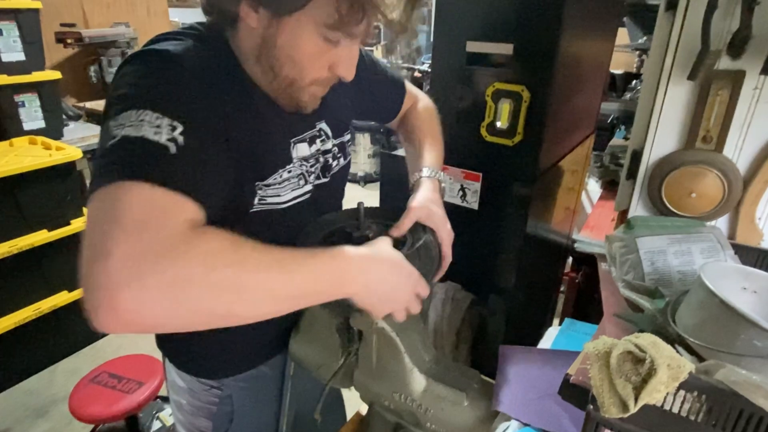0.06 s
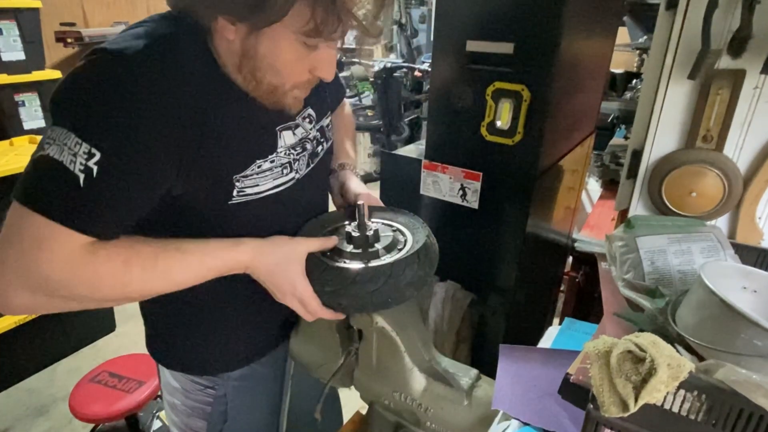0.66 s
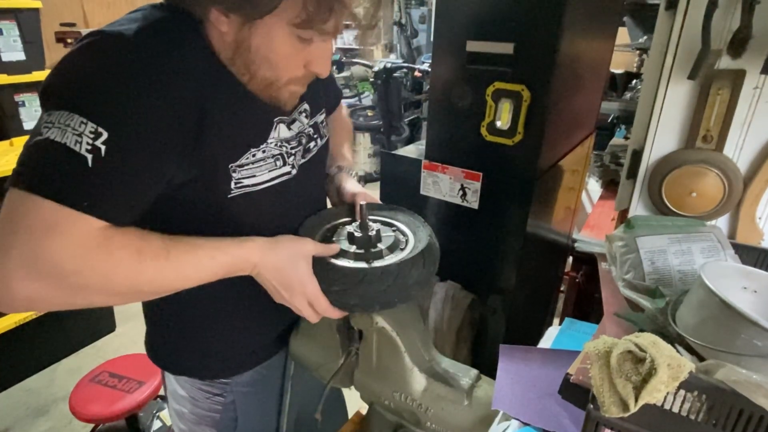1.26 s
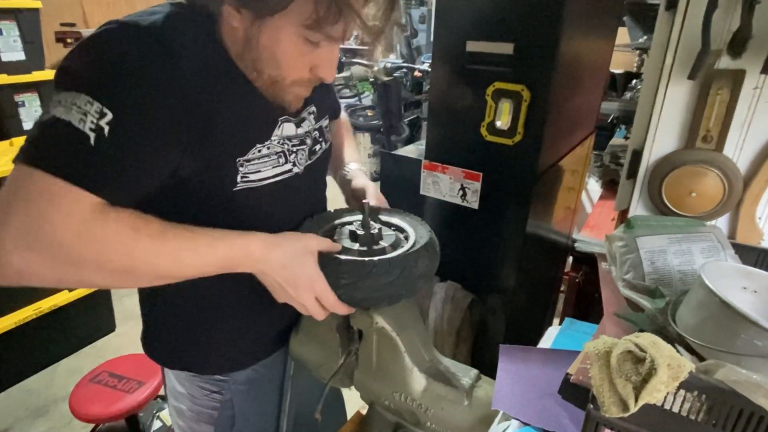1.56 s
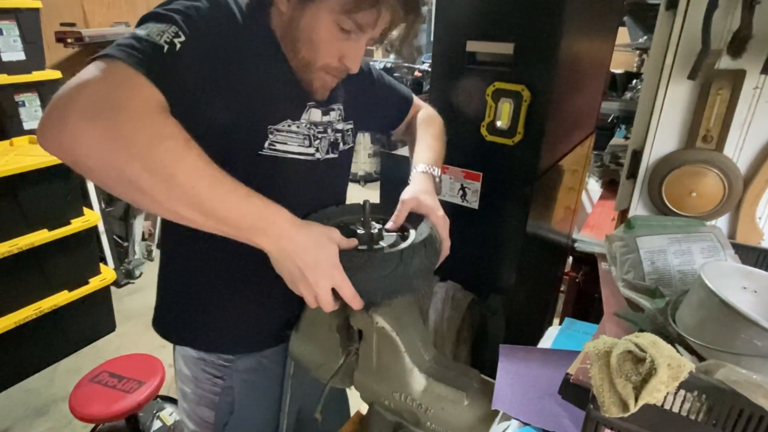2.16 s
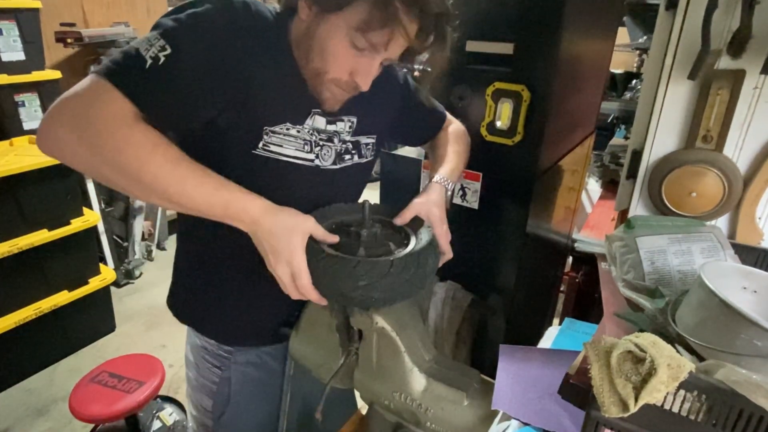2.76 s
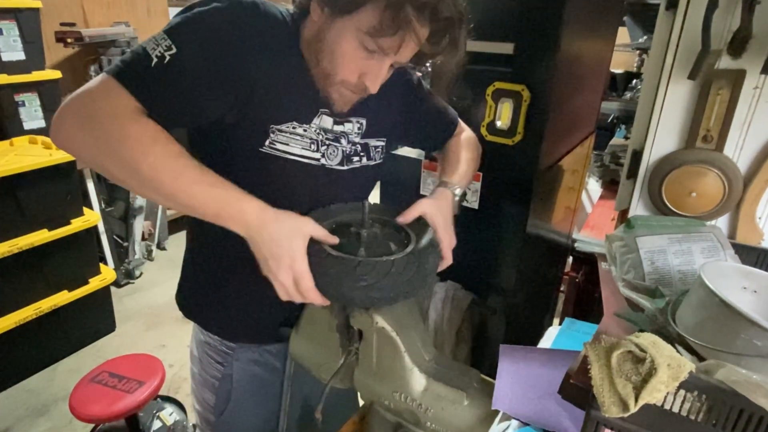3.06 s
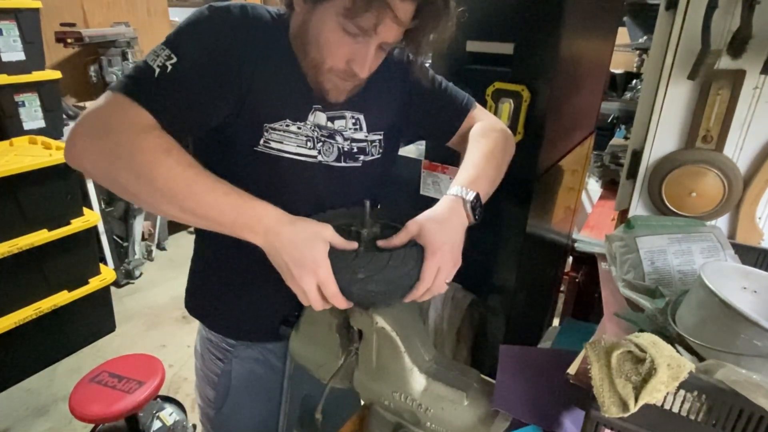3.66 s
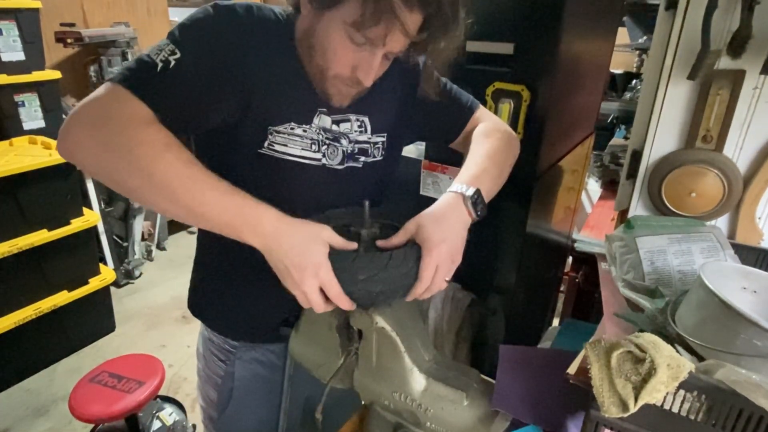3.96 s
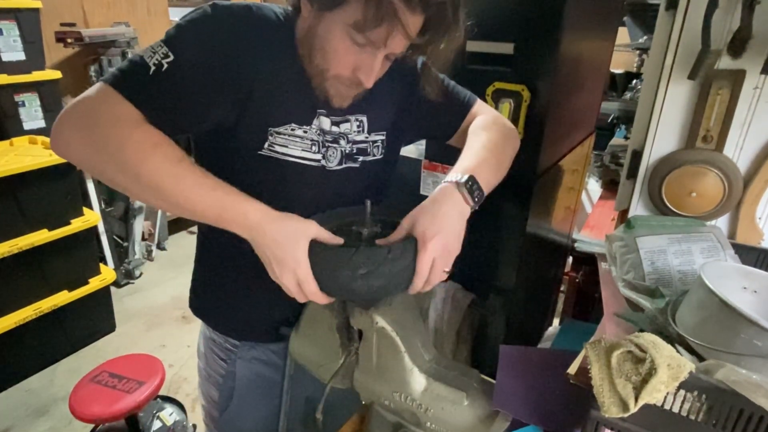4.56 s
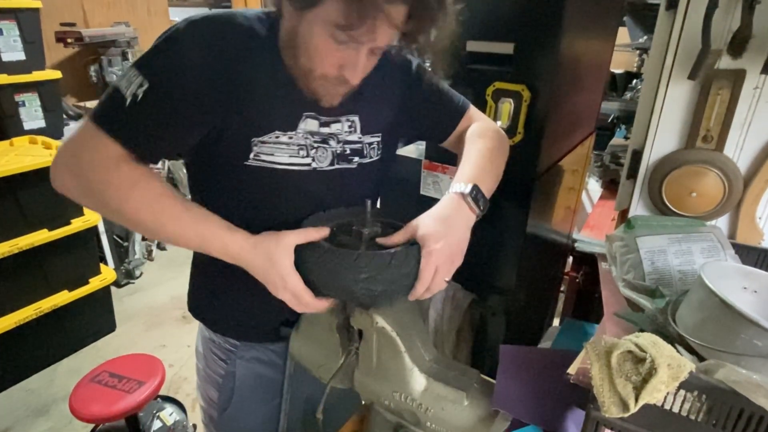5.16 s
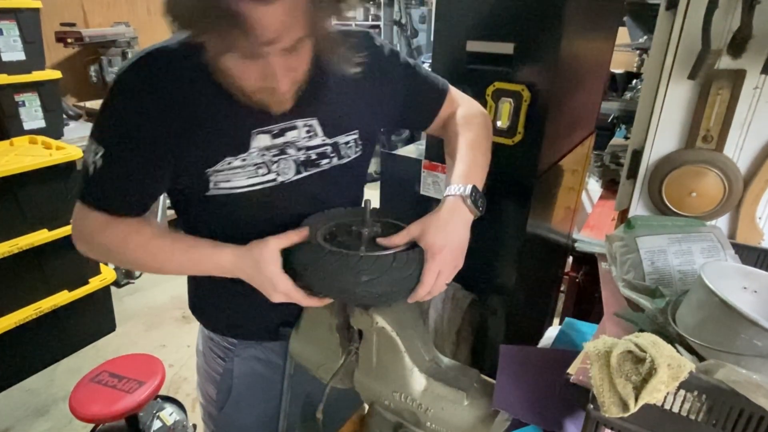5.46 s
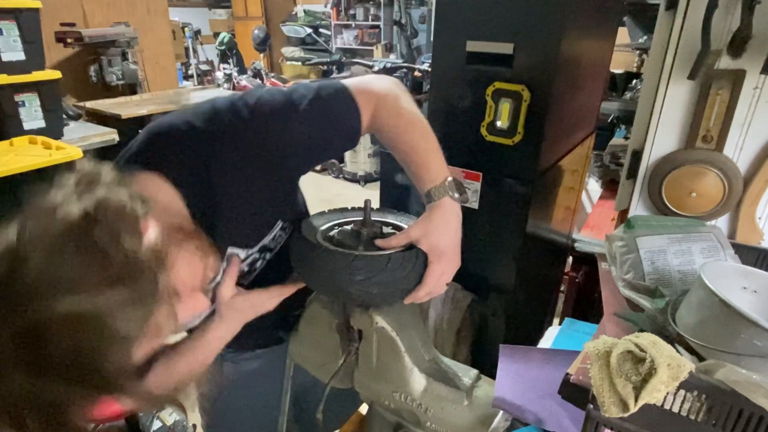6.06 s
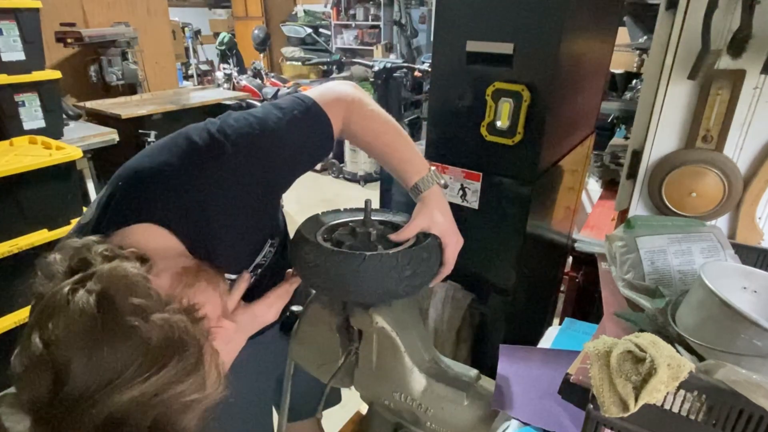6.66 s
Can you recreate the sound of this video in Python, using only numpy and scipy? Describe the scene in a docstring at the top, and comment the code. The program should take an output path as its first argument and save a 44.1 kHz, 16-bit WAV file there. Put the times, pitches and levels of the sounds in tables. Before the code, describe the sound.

Close up in a small, dry-sounding workshop, stretched rubber catches and snaps over a metal wheel rim as a flat tire is pulled by hand. An early sharp chirp and a ringing clink stand out. After some softer ticks comes a cluster of snaps, rasps and hollow creaks with lighter clinks. Hands and sleeves rustle over the low rumble of the rocking stand, then the handling dies down.

```python
"""Rubber scrapes, snaps and chirps as a small flat tire is worked off its metal rim by hand.
The stretched bead catches on the metal, snaps over it and slips in short falling chirps;
the hollow tire groans and its soft carcass wobbles. The rim clinks, once loudly.
Hands and sleeves rustle over the low rumble of the rocking stand, in a cluttered workshop."""
import sys
import numpy as np
from scipy import signal
from scipy.fft import rfft, irfft, next_fast_len
from scipy.io import wavfile
from scipy.ndimage import map_coordinates

SR = 44100
rng = np.random.default_rng(int(sys.argv[2]) if len(sys.argv) > 2 else 0)


def master_out(mix):
    """Clip the mix to full scale and print it as 16-bit PCM to the path in sys.argv[1]."""
    frames = np.transpose(np.atleast_2d(mix))
    ceiling = np.clip(frames, -1, 1)
    pcm = np.round(ceiling * 32767).astype(np.int16)
    wavfile.write(sys.argv[1], SR, pcm)


N = 305216

# Noise colours, each: freq_hz, density_db
AIR_EQ = [(59, -36), (100, -5), (185, -19.5), (415, -34.5), (705, -35), (1480, -50.5), (12000, -51.5),
          (16000, -56)]  # room tone
RUMBLE_EQ = [(11, -32), (22, -5), (45, 2), (70, 8), (83, 6), (108, 0.5), (141, -8), (160, -17),
             (210, -47.5), (350, -120)]  # rocking stand
CLOTH_EQ = [(530, -34.5), (900, -4.5), (1100, -5), (4010, -7), (7060, -4), (7860, -7.5), (11600, -3.5),
            (13400, -24.5), (14500, -9.5), (16000, -18.5)]  # skin and sleeves
FLEX_EQ = [(65, -22.5), (110, 5), (177, -1.5), (242, -1.5), (345, -4), (404, -24.5), (520, -14.5),
           (680, -43.5), (1140, -120)]  # bending rubber
SCRAPE_EQ = [(240, -27.5), (400, -4.5), (677, -5), (1120, -15), (1370, -8.5), (1850, -18), (2110, -8),
             (2470, -20), (7000, -24.5), (9100, -53.5), (15400, -120)]  # rubber on metal
CLANK_EQ = [(710, -57), (1200, -28.5), (1350, -13.5), (1870, -30), (2400, -8.5), (3800, -26), (4500, -13.5),
            (6200, -13), (6950, -1), (8000, -21.5), (9820, -6.5), (12200, -23), (13600, -35.5),
            (15000, -27), (16000, -26.5)]  # struck rim
KNOCK_EQ = [(110, -19), (200, 2), (450, -12), (700, -9), (1300, -8), (1800, -17), (2150, -12), (2900, -21),
            (4200, -31.5), (5460, -40.5), (9240, -120)]  # dull body of a snap
CLICK_EQ = [(1470, -16.5), (2200, -9), (3000, 0), (3850, -9), (4700, 1), (6200, -7), (7300, -2),
            (8200, -12.5), (11800, -12), (13600, -25), (14800, -21.5), (16000, -25.5)]  # bright tip of a snap
# Stereo spread of the noises: freq_hz, side_over_mid_db
STEREO_WIDTH = [(60, -14.5), (150, -16), (350, 5), (1000, 1), (4000, -0.5), (12000, 0)]
# Workshop reverb: freq_hz, t60_s
ROOM_DECAY = [(150, 0.32), (700, 0.16), (2500, 0.18), (7000, 0.18), (14000, 0.056)]

# Rubber resonances, each: pitch_hz, width_hz, level_db
CAVITY_MODES = [(145, 40, 6.5), (244, 6.2, 1.5), (327, 32, -4), (438, 30, -18), (548, 13, -12),
                (660, 16, -4.5), (2110, 80, -20)]  # hollow of the tire
BEAD_MODES = [(580, 120, 0.5), (900, 320, -4), (2020, 170, -1.5)]  # stretched bead
TIRE_MODES = [(667.4, 46, 0), (1050, 160, -4), (1350, 38, -5), (2144, 60, -12), (2850, 110, -12.5)]  # damped ring after a snap
# Ring of the metal rim: pitch_hz, level_db, t60_s, left_over_right_db
RIM_MODES = [(2270, -15, .17, 5), (2420, -12.5, .18, 9), (3042, -16, .25, -1), (3260, -18, .28, 4),
             (4468, -16, .4, 1), (4590, -17, .26, 1), (5733, -11, .25, 4), (5830, -11, .2, 6),
             (6685, -12, .26, 4), (6990, 1.5, .27, 4), (7380, -15, .22, 0), (8696, -6, .27, 9),
             (9560, -9, .33, -8), (9876, -3, .27, -14), (10110, -9, .3, -6), (10990, -7, .3, 0),
             (11753, -11, .32, 0), (12190, -11, .24, 0), (14550, -17, .3, 2)]

# Level rides, each: time_s, level_db
STAND_SWAY = [(0.0, -50.5), (0.77, -61), (1.17, -48), (1.97, -56), (2.12, -43), (2.51, -62), (2.91, -50),
              (3.89, -54), (4.1, -54), (4.87, -44), (5.3, -52.5), (5.78, -59), (6.92, -63)]  # the wheel rocking on its stand
HAND_EFFORT = [(0.0, -52.5), (0.35, -68), (0.72, -69.5), (1.13, -62.5), (1.42, -52.5), (1.69, -62.5),
               (1.85, -66), (2.16, -57.5), (2.45, -69.5), (2.9, -70), (3.14, -63.5), (3.62, -69.5),
               (3.9, -64.5), (4.38, -60.5), (4.55, -63.5), (4.68, -60), (4.99, -62), (5.25, -74),
               (5.8, -62.5), (6.34, -65.5), (6.61, -81.5), (6.92, -70)]  # how hard the hands flex the rubber
# Strokes, each: start_s, level_db, length_s
SWISH_CUES = [(-.02, -53.5, .2), (0.208, -58.5, 0.23), (0.452, -62.5, 0.28), (0.753, -66, 0.26),
              (2.25, -68, 0.25), (2.46, -57, .12), (2.514, -68, 0.28), (3.001, -62, 0.18),
              (3.178, -54, 0.29), (4.062, -60.5, .18), (5.291, -62.5, 0.34), (5.615, -57, 0.42),
              (5.819, -62.5, 0.41), (6.834, -72.5, 0.2)]  # palms and sleeves over the tread
GROAN_CUES = [(0.0, -63, 0.37), (.54, -56.5, 0.1), (1.3, -52, .36), (1.98, -51, 0.15), (3.0, -51, 0.14),
              (3.47, -54, 0.075), (3.7, -56, 0.27), (4.11, -49.5, 0.2), (4.47, -43, 0.11),
              (4.66, -54.5, 0.24), (4.9, -48.5, .16), (5.08, -56, 0.16), (5.478, -56, 0.047)]  # steady pulls on the tire
DRAG_CUES = [(1.31, -58.5, 0.44), (1.91, -53, 0.075), (3.6, -66.5, 0.2), (3.81, -57, 0.12),
             (4.44, -49.5, 0.13), (4.64, -49.5, 0.089), (4.87, -61.5, 0.26)]  # the bead dragging along the rim
GRAZE_CUES = [(1.81, -70, 0.059), (1.905, -64.5, 0.057), (3.44, -65.5, 0.079)]  # the rim grazing its stand
# The carcass springing back: start_s, level_db
WOBBLE_CUES = [(0.313, -39), (0.984, -18.5), (1.3, -32.5), (1.946, -31.5), (2.183, -30.5), (2.277, -35.5),
               (2.829, -29.5), (3.457, -29), (3.988, -27), (4.249, -27.5), (4.3, -34.5), (4.559, -23.5),
               (4.726, -31.5), (4.987, -34.5), (5.431, -43.5), (5.511, -38.5), (6.429, -43.5)]
# Metal striking the rim: start_s, level_db, favoured_hz, rolloff_db_per_octave
CLINK_CUES = [(1.562, -27, 7000, -1.5), (1.57, -21.5, 8000, 6.5), (1.575, -22, 8070, -3.5),
              (3.428, -30.5, 6760, 19), (4.229, -40, 7600, 16), (4.542, -43.5, 10100, 26),
              (5.052, -49, 4900, 26)]
# Rubber slipping as its tension lets go: start_s, level_db, start_hz, end_hz
SLIP_CUES = [(.9, -41.5, 255, 118), (0.964, -22.5, 169, 120), (0.957, -9.5, 1063, 785),
             (.962, -18.5, 266, 200), (.967, -24, 773, 610), (1.183, -39, 1390, 1200),
             (1.252, -34.5, 1250, 710), (1.28, -29, 232, 127.5), (2.02, -45.5, 260, 206),
             (2.078, -31.5, 1530, 1430), (2.212, -32.5, 1387, 1150), (2.767, -42, 334, 188),
             (2.805, -40.5, 576, 162), (3.917, -44, 1020, 525), (3.919, -35, 423, 170),
             (3.959, -37, 332, 129), (4.141, -44.5, 324, 243), (4.2272, -23.5, 2860, 2320),
             (4.2285, -19.5, 1460, 1340), (4.231, -23.5, 1396, 1200), (4.236, -27, 805, 580),
             (4.491, -37, 670, 304), (4.881, -38, 1660, 1250), (4.889, -35.5, 1043, 640),
             (4.894, -29, 478, 204), (4.926, -31.5, 238, 153), (5.4, -35.5, 373, 293),
             (5.404, -38, 219, 166), (5.479, -49.5, 442, 385)]
# The bead snapping over the rim: time_s, click_db, knock_db, crack_eq_db, top_eq_db, creep_s
SNAP_CUES = [(.0024, -33, -34, -1, -13.5, .0005), (.8031, -48, -46, 0.5, 3.5, .0008),
             (.8941, -28.5, -34.5, 0.5, 0.5, 0.00089), (0.9572, -24.5, -30, 2.5, -8.5, 0.00046),
             (1.0254, -40.5, -41.5, 1.5, -12.5, 0.0066), (1.1874, -46, -48.5, -6, -9, 0.0058),
             (1.2541, -38, -40.5, -3, -2.5, .0007), (1.27, -27.5, -34, -1, -3.5, .0027),
             (1.3432, -38, -44.5, 5, -16.5, 0.0098), (1.5725, -24.5, -39, 0.5, -7, 0.006),
             (2.077, -40, -38.5, -2, -15, 0.0044), (2.1308, -47, -41, -1, -9, .0013),
             (2.153, -38, -43.5, 6, -17.5, .003), (2.1723, -40.5, -44.5, 4.5, -16.5, .004),
             (2.2145, -40, -41, 2, -15, .002), (2.662, -51.5, -82, 3, -28.5, .0033),
             (2.77, -43, -46, 0.5, -16.5, .006), (2.804, -52.5, -44.5, -2, -16.5, .0005),
             (2.9947, -49.5, -46, -6.5, -18, 0.0044), (3.0527, -42.5, -51.5, 1, -19.5, 0.0081),
             (3.386, -39, -53.5, 0, -14, .0005), (3.431, -18, -42, 1, -18, 0.0044),
             (3.4554, -32.5, -43, 3.5, -4.5, 0.012), (3.5259, -33.5, -52, 0, -8, .0066),
             (3.6051, -31.5, -62, -2.5, -9, 0.00099), (3.673, -44.5, -53, -2, -13, 0.012),
             (3.973, -44.5, -47, 2, -12.5, .007), (4.0188, -51, -62, -2, -6.5, .001),
             (4.2284, -34, -37, 7.5, -20, 0.00056), (4.2478, -23, -40, -1.5, -16.5, .0045),
             (4.4514, -34, -52, 1, -16, 0.0011), (4.4688, -36.5, -39.5, 3, -26, .0053),
             (4.484, -26.5, -42.5, -1, -20.5, 0.0024), (4.533, -34.5, -52, 2, -9.5, .001),
             (4.5428, -27.5, -46.5, 1, -10.5, .0007), (4.559, -38.5, -58, -6, -11.5, .002),
             (4.665, -37, -48.5, 3, -19, .004), (4.6959, -26.5, -36.5, 0, -16.5, 0.0092),
             (4.9107, -44, -38.5, 2, -13.5, 0.0018), (4.9335, -38.5, -43, 0, -11.5, .0058),
             (4.955, -35, -47.5, -5.5, -19, 0.0067), (5.0505, -33, -46, 0, -18.5, .0062),
             (6.144, -51.5, -64, -3, -32, .0032), (6.2183, -51, -83, 0, -27, .0024)]


def amp(db):
    """Decibels to gain."""
    return 10 ** (np.asarray(db) / 20)


def unit(x):
    """Scale to rms 1."""
    return x / np.sqrt(np.mean(x ** 2) + 1e-20)


def along(points, hz):
    """Read a curve on a log frequency axis."""
    freqs, values = np.transpose(points)
    return np.interp(np.log(hz + 1), np.log(freqs + 1), values)


def ride(points):
    """A fader ride in dB, one value per sample."""
    return np.interp(np.arange(N) / SR, *np.transpose(points))


def drift(rate_hz):
    """A smooth random wander."""
    knots = rng.standard_normal(int(N * rate_hz / SR) + 4)
    return map_coordinates(knots, [np.arange(N) * rate_hz / SR])


def filtered(x, response):
    """Apply a frequency response."""
    size = next_fast_len(x.shape[-1] + 8192)
    return irfft(rfft(x, size) * response(np.fft.rfftfreq(size, 1 / SR)), size)[..., :x.shape[-1]]


def resonate(x, modes):
    """Play x through parallel resonances."""
    return filtered(x, lambda f: sum(amp(db) * 1j * f * width / (hz ** 2 - f ** 2 + 1j * f * width)
                                     for hz, width, db in modes))


def coloured(pair, eq):
    """Two unrelated signals become stereo at rms 1, near mono in the bass."""
    mid = filtered(pair[0], lambda hz: amp(along(eq, hz)))
    side = filtered(pair[1], lambda hz: amp(along(eq, hz) + along(STEREO_WIDTH, hz)))
    return unit(np.array([mid + side, mid - side]))


def grains(eq, rate_hz, spread_db):
    """Friction: tiny catches of uneven size at random moments."""
    catches = (rng.random(N) < rate_hz / SR) * amp(spread_db * rng.standard_normal(N))
    return coloured(catches * rng.standard_normal((2, N)), eq)


def narrow_noise():
    """White noise, mostly in the centre."""
    return rng.standard_normal(N) + 0.5 * rng.standard_normal((2, N))


def add(track, start_s, sound):
    """Mix a sound into a stereo track."""
    start = round(start_s * SR)
    sound = sound[..., max(0, -start):]
    part = track[:, max(0, start):][:, :sound.shape[-1]]
    part += sound[..., :part.shape[1]]


def swell(progress, skew):
    """A rounded rise and fall; skew below 1 peaks early."""
    return np.abs(np.sin(np.pi * progress ** skew))


def strokes(cues, skew, taper=1):
    """An envelope of one swell per cue; more taper softens both ends."""
    out = np.zeros((2, N))
    for start_s, db, length_s in cues:
        progress = np.linspace(0, 1, int(length_s * SR) + 2)
        add(out, start_s, amp(db) * swell(progress, skew) ** taper)
    return out


def room_tone(level_db):
    """The steady, low hush of the room."""
    return amp(level_db) * coloured(rng.standard_normal((2, N)), AIR_EQ)


def workshop_echo(send, build_s):
    """Shelves and clutter return a short diffuse tail, a different one to each side."""
    hz, t, spectrum = signal.stft(rng.standard_normal((2, SR // 2)), SR, nperseg=256)
    decay = amp(-60 * t / along(ROOM_DECAY, hz)[:, None])
    tail = signal.istft(spectrum * decay, SR, nperseg=256)[1]
    tail *= 1 - np.exp(-np.arange(tail.shape[1]) / SR / build_s)
    return signal.fftconvolve(send, tail / np.linalg.norm(tail[0]), axes=1)[:, :N]


def stand_rumble(level_db, lurch_db):
    """The wheel rocks on its stand in deep, uneven lurches."""
    sway = amp(ride(STAND_SWAY) + level_db + lurch_db * drift(9.9))
    return sway * coloured(rng.standard_normal((2, N)), RUMBLE_EQ)


def cloth_swishes(rest_db, drag_db, flutter_db, crackle_db, crossover_hz):
    """Skin and cloth rustle in strokes, over a faint rub that grows while the bead drags."""
    rub = amp(ride(HAND_EFFORT) + rest_db) + amp(drag_db) * strokes(DRAG_CUES, skew=0.93)
    rustle = grains(CLOTH_EQ, rate_hz=7000, spread_db=1)
    rustle += amp(crackle_db) * grains(CLOTH_EQ, rate_hz=260, spread_db=3)
    soft = filtered(rustle, lambda hz: 1 / (1 + (hz / crossover_hz) ** 4))
    # quicker is brighter: 4 dB more treble at half the length
    treble_cues = [(s, db + 4 * np.log2(0.21 / length_s), length_s) for s, db, length_s in SWISH_CUES]
    out = np.zeros((2, N))
    for cues, band in [(SWISH_CUES, soft), (treble_cues, rustle - soft)]:
        envelope = np.hypot(strokes(cues, skew=0.68, taper=2), rub)
        out += envelope * amp(flutter_db * drift(30)) * band
    return out


def rubber_handling(flex_db, scrape_db, drag_db, catch_db):
    """Rubber flexes and scrapes on the rim, both in the same uneven catches."""
    effort = amp(ride(HAND_EFFORT))
    catch = amp(catch_db * drift(9.8))
    flex = amp(flex_db) * effort * grains(FLEX_EQ, rate_hz=270, spread_db=2.5)
    pressure = np.hypot(amp(scrape_db) * effort, amp(drag_db) * strokes(DRAG_CUES, skew=0.91))
    scrape = pressure * grains(SCRAPE_EQ, rate_hz=2600, spread_db=0)
    return catch * (flex + scrape)


def tire_groans(level_db, lumps_db):
    """A steady pull feeds uneven bunches of small slips into the hollow tire."""
    slipping = amp(lumps_db * drift(60)) * narrow_noise()
    return amp(level_db) * strokes(GROAN_CUES, skew=0.87) * unit(resonate(slipping, CAVITY_MODES))


def carcass_wobbles(level_db, pitch_hz, swings):
    """The soft carcass swings for a few cycles until the hands damp it."""
    out = np.zeros((2, N))
    progress = np.linspace(0, 1, int(swings / pitch_hz * SR))
    envelope = swell(progress, skew=0.51)
    for start_s, db in WOBBLE_CUES:
        cycles = swings * (1 + 0.016 * rng.standard_normal())
        add(out, start_s, amp(db + level_db) * envelope * np.sin(2 * np.pi * cycles * progress))
    return out


def rim_ring(favoured_hz, rolloff_db, split_hz=34, count=7):
    """One blow on the rim: each mode beats with weaker, shorter partials and has its own pan."""
    t = np.arange(SR // 3) / SR
    ring = np.zeros((2, len(t)))
    side_fade = amp(-6 - 5 * t)
    for hz, db, t60_s, pan_db in RIM_MODES:
        detune_hz = split_hz * np.sqrt(np.arange(count)) * rng.standard_normal(count)
        partials = np.sin(2 * np.pi * ((hz + detune_hz[:, None]) * t + rng.random((count, 1))))
        beating = side_fade * (rng.standard_normal((2, count - 1)) @ partials[1:])
        pan = unit(amp([[pan_db / 2], [-pan_db / 2]]))
        envelope = amp(db - rolloff_db * abs(np.log2(hz / favoured_hz)) - 60 * t / t60_s)
        ring += pan * envelope * (partials[0] + beating)
    return ring / np.abs(ring).max()


def rim_grazes(level_db):
    """Light rubbing of metal on metal keeps the rim singing faintly."""
    ring = rim_ring(favoured_hz=4500, rolloff_db=1.5)
    rub = strokes(GRAZE_CUES, skew=0.7) * rng.standard_normal((2, N))
    return amp(level_db) * signal.fftconvolve(rub, ring / np.linalg.norm(ring[0]), axes=1)[:, :N]


def rim_clinks(ring_db, attack_db, attack_t60_s, clank_db, clank_t60_s, shimmer_db, shimmer_t60_s):
    """The rim's modes flare at each contact, then ring on amid a shimmer of many weaker ones."""
    out, t = np.zeros((2, N)), np.arange(SR // 3) / SR
    clatter = grains(CLANK_EQ, rate_hz=4100, spread_db=2.5)
    flare = (1 + amp(attack_db - 60 * t / attack_t60_s)) * (1 - np.exp(-t / 0.00048))
    clatter_fade = amp(clank_db - 60 * t / clank_t60_s) + amp(shimmer_db - 60 * t / shimmer_t60_s)
    for start_s, db, favoured_hz, rolloff_db in CLINK_CUES:
        ring = amp(ring_db) * flare * rim_ring(favoured_hz, rolloff_db)
        clank = clatter_fade * clatter[:, round(start_s * SR):][:, :len(t)]
        add(out, start_s, amp(db) * (ring + clank))
    return out


def bead_rasps(level_db, rate_hz):
    """Dragged over the metal, the stretched bead catches densely and rasps in its own resonances."""
    catches = (rng.random(N) < rate_hz / SR) * narrow_noise()
    rasp = resonate(resonate(catches, BEAD_MODES), BEAD_MODES)
    return amp(level_db) * strokes(DRAG_CUES, skew=1) * unit(rasp)


def bead_crackles(level_db):
    """The strained bead ticks at random while it drags."""
    return amp(level_db) * strokes(DRAG_CUES, skew=0.82) * grains(CLICK_EQ, rate_hz=500, spread_db=1.5)


def bead_slips(level_db, pitch_jitter, overtone_db, judder_db):
    """The bead judders over the metal in a chirp that falls as the rubber relaxes."""
    out = np.zeros((2, N))
    for start_s, db, start_hz, end_hz in SLIP_CUES:
        centre_khz = np.sqrt(start_hz * end_hz) / 1000
        length_s = 0.0125 / centre_khz ** 0.62  # slacker, lower rubber slips longer
        length_s /= 2 ** ((db + 35.5) / 24)  # 24 dB harder takes half as long
        progress = np.linspace(0, 1, int(length_s * SR) + 2)
        bend, grip = (map_coordinates(knots, [progress * 11]) for knots in rng.standard_normal((2, 12)))
        pitch_hz = start_hz * (end_hz / start_hz) ** progress * (1 + pitch_jitter * bend)
        phase = 2 * np.pi * np.cumsum(pitch_hz) / SR
        tone = np.sin(phase) + amp(overtone_db) * np.sin(2 * phase)
        add(out, start_s, amp(db + level_db + judder_db * grip) * swell(progress, skew=0.8) * tone)
    return out


def bead_snaps(click_db, knock_db, ring_db, edge_db, creep_db, t60_s, damping_hz, colour_db):
    """The bead creeps, then snaps: a bright click, a dull knock and a few damped tire modes."""
    out, lead = np.zeros((2, N)), SR // 40
    t = np.arange(-lead, SR // 5) / SR
    after = np.maximum(t, 0)
    clicks = grains(CLICK_EQ, rate_hz=4800, spread_db=3)
    knocks = grains(KNOCK_EQ, rate_hz=3000, spread_db=3)
    mode_hz, width_hz, mode_db = np.transpose(TIRE_MODES)[:, :, None]
    ring_fade = np.exp(-np.pi * (width_hz + damping_hz) * after)
    bands_hz = np.geomspace(200, 16000, 30)
    crack_band, top_band = (bands_hz > 1700) & (bands_hz < 3400), bands_hz > 8500
    for time_s, tip_db, body_db, crack_db, top_db, creep_s in SNAP_CUES:
        here = round(time_s * SR) + np.arange(len(t))
        envelope = np.where(t < 0, amp(creep_db) * np.exp(-np.abs(t / creep_s)), amp(-60 * after / t60_s))
        shift, strength = rng.standard_normal((2, len(mode_hz), 1))  # the grip retunes the rubber
        modes = np.sin(2 * np.pi * mode_hz * (1 + 0.027 * shift) * after)
        ring = (amp(mode_db + 2.3 * strength) * ring_fade * modes).sum(0)
        body = amp(knock_db) * envelope * knocks[:, here] + amp(ring_db) * ring / np.abs(ring).max()
        snap = amp(tip_db + click_db) * envelope * clicks[:, here] + amp(body_db) * body
        # each snap has its own colour and its own amount of crack and high-treble edge
        eq_db = colour_db * rng.standard_normal(len(bands_hz))
        eq_db += crack_db * crack_band + (top_db + edge_db) * top_band
        add(out, time_s - lead / SR, filtered(snap, lambda hz: amp(np.interp(hz, bands_hz, eq_db))))
    return out


def from_the_right(x, lag_s):
    """Place a sound to the right by delaying the left channel."""
    return filtered(x, lambda hz: np.exp(-2j * np.pi * hz * np.array([[lag_s], [0]])))


def scene():
    """The wheel close up, its echo, and the quiet of the room."""
    bead = bead_snaps(click_db=-10, knock_db=2.5, ring_db=1, edge_db=17.5, creep_db=-4.5,
                      t60_s=0.048, damping_hz=39.8, colour_db=2.5)
    bead += bead_crackles(level_db=-13.5)
    chirps = bead_slips(level_db=-6, pitch_jitter=0.1, overtone_db=-26.5, judder_db=5)
    chirps = from_the_right(chirps, lag_s=0.00023)
    rim = rim_clinks(ring_db=-3.5, attack_db=13.5, attack_t60_s=0.068, clank_db=-8.5, clank_t60_s=0.063,
                     shimmer_db=-27, shimmer_t60_s=0.47)
    rim += rim_grazes(level_db=11)
    hollow = amp(-2) * resonate(bead + amp(-5.5) * chirps, CAVITY_MODES)
    hollow += tire_groans(level_db=-1, lumps_db=4)
    echo = workshop_echo(amp(-6.5) * bead + amp(-9) * chirps + amp(-24) * rim, build_s=0.0014)
    carcass = carcass_wobbles(level_db=-1.5, pitch_hz=73.6, swings=5.53)
    rubber = rubber_handling(flex_db=2.5, scrape_db=-4, drag_db=-0.5, catch_db=2.5)
    stand = stand_rumble(level_db=4.5, lurch_db=4)
    rasp = bead_rasps(level_db=1, rate_hz=900)
    cloth = cloth_swishes(rest_db=-10, drag_db=-17.5, flutter_db=3, crackle_db=-15, crossover_hz=5000)
    background = room_tone(level_db=-66.5) + echo + stand + cloth
    return background + rubber + hollow + carcass + rim + rasp + chirps + bead


def record(dry):
    """A brick-wall high cut on the mix."""
    return filtered(dry, lambda hz: hz < 15900)


dry = scene()
out = record(dry)
master_out(out)
```